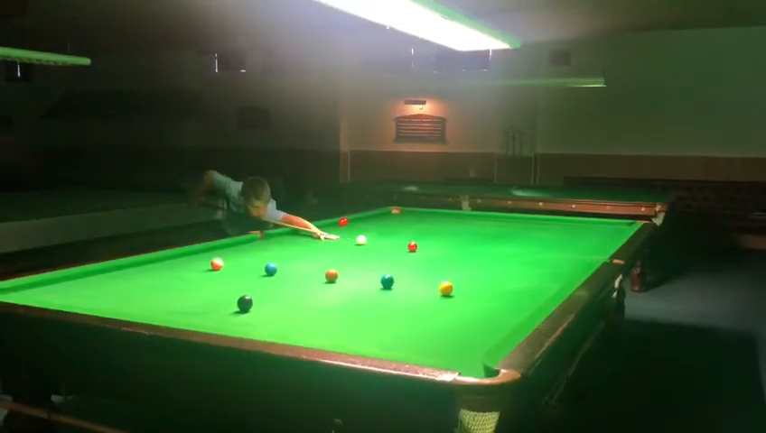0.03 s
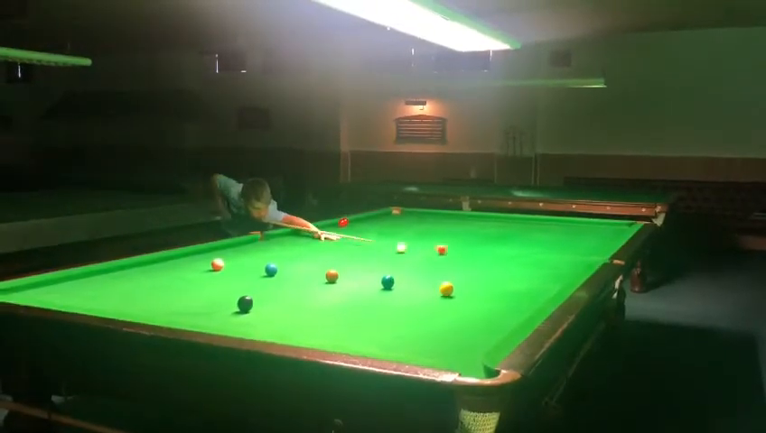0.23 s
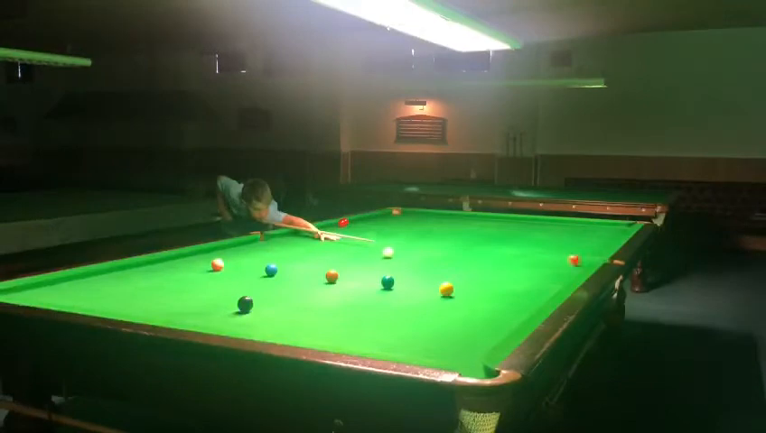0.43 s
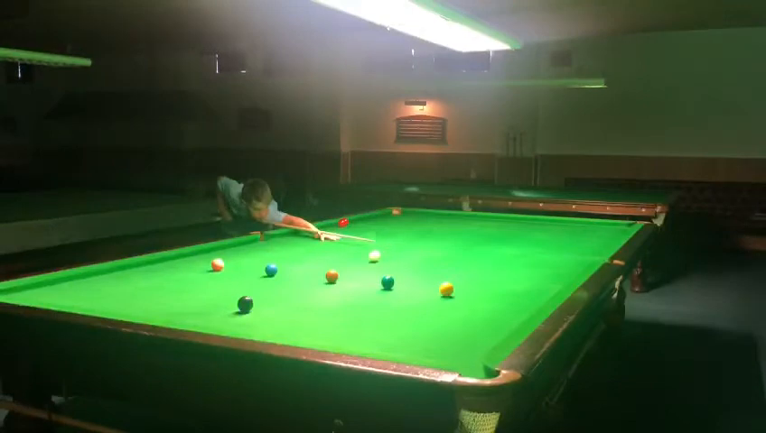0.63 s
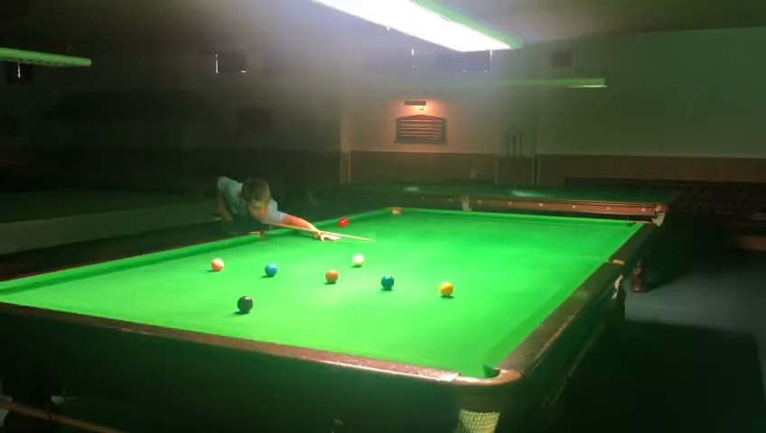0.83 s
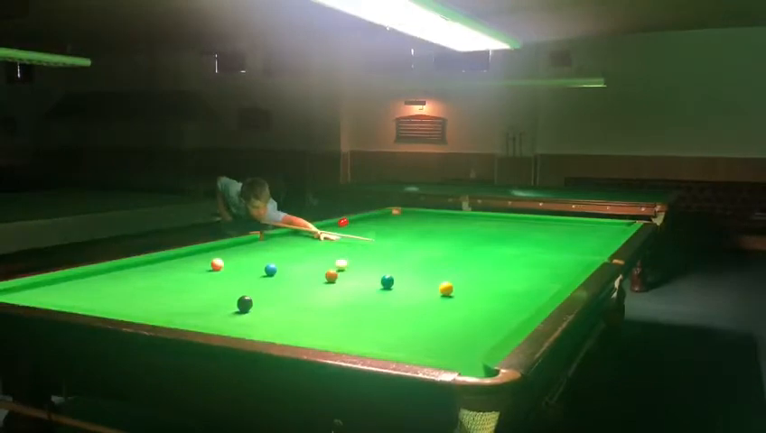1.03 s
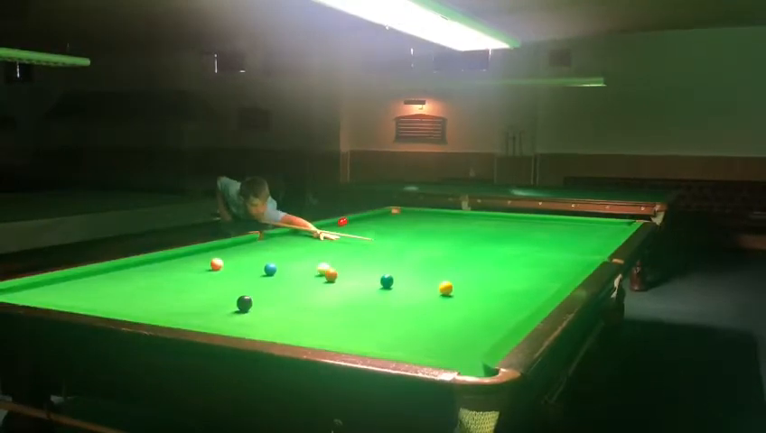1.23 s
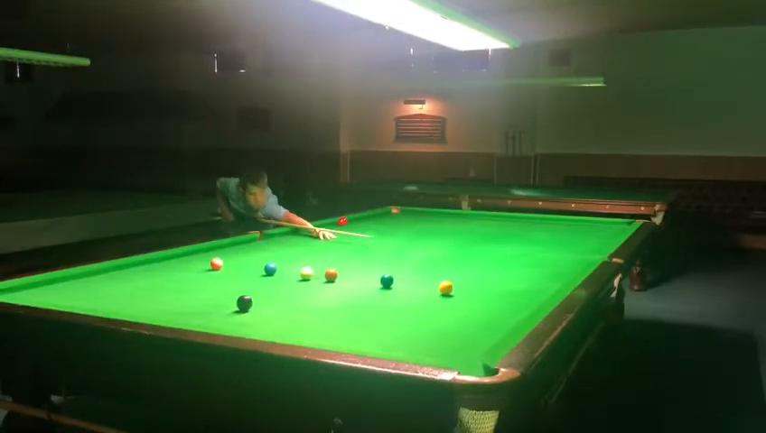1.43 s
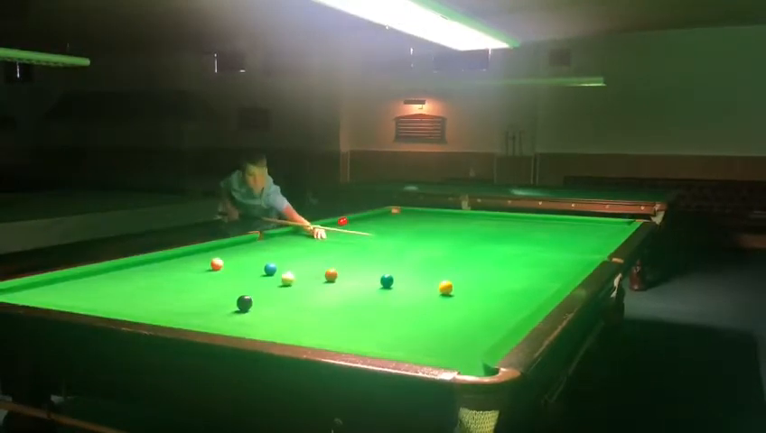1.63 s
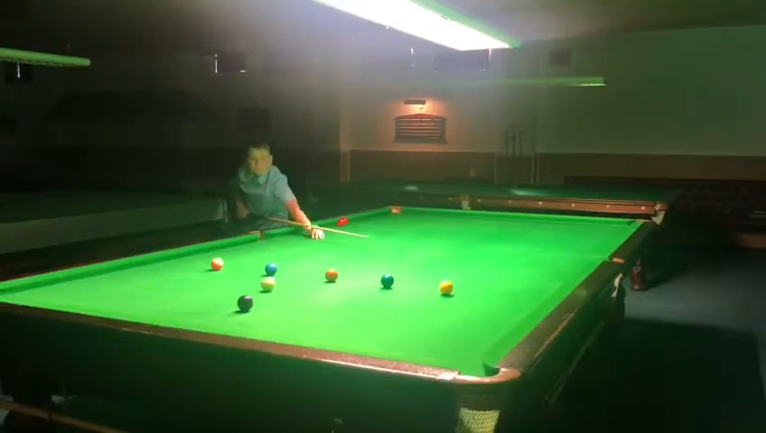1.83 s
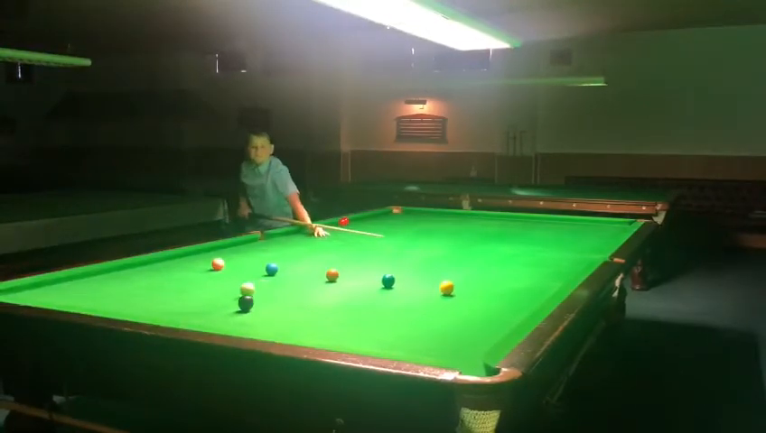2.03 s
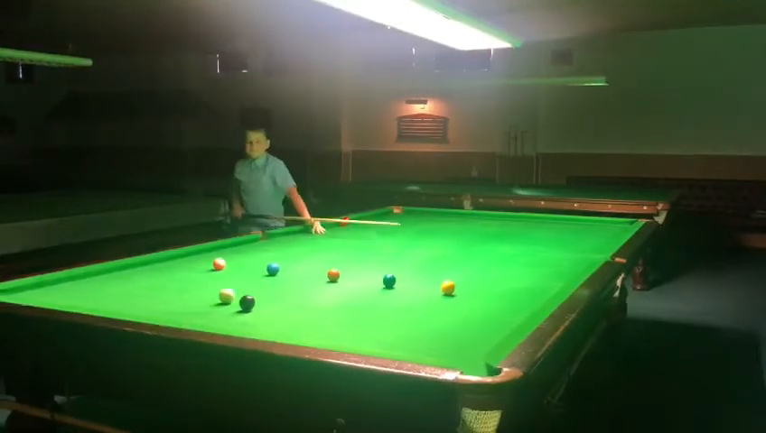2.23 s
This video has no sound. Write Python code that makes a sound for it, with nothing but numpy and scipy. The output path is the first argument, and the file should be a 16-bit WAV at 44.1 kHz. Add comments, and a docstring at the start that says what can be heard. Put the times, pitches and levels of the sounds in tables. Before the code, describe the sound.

Snooker balls collide with a hard click just after a light cue tap. One rumbles softly over the cloth and clatters into a pocket with two smaller clicks. Near the table, only low ventilation hum and faint clothing rustle remain.

```python
"""Snooker balls click in a quiet hall: each hard impact radiates one short pressure pulse.
A cue taps the white, which strikes a red; the red rumbles over the cloth, knocks on the pocket jaws,
clatters down and clicks on a ball below. The wooden shaft and rail ring in their damped modes,
and reflections from the table and walls merge into brief reverberation.
Ventilation hums throughout, the player's clothes rustle, and a faint squeak comes at the end."""
import sys
import numpy as np
from scipy import signal
from scipy.fft import rfft, irfft, next_fast_len
from scipy.io import wavfile
from scipy.ndimage import uniform_filter1d, map_coordinates

SR = 44100
rng = np.random.default_rng(int(sys.argv[2]) if len(sys.argv) > 2 else 0)


def generate_wav(signal):
    """Clip the signal to [-1, 1] and save it as 16-bit WAV at the path in sys.argv[1]."""
    frames = np.transpose(np.atleast_2d(signal))
    scaled = np.clip(frames, -1, 1) * 32767
    pcm = np.round(scaled).astype(np.int16)
    wavfile.write(sys.argv[1], SR, pcm)


N = 105840

# ball on ball: start_s, level_db, dull_db_per_octave, scatter_db, scatter_t60_s, hall_db, walls_db, snap_db
BALL_IMPACTS = [(0.2912, 10, -0.5, 0.5, 0.064, 1, -1, -24), (0.7618, 1, 6.5, 8, 0.067, 5.5, 3, -35),
                (0.8056, -10.5, 9, 6, 0.043, -1.5, -19, -47)]
# spectra of the contact pulse and of its bright snap: frequency_hz, level_db
CLICK_SPECTRUM = [(50, -33), (300, -16.5), (700, -25.5), (1200, -12), (2400, 5.5), (3900, 2.5),
                  (4700, -9.5), (6000, -27.5), (8000, -31.5), (11000, -29.5)]
SNAP_SPECTRUM = [(100, -36.5), (2500, -17.5), (5000, 20), (8000, -2), (9500, 4.5), (11000, 6.5)]
# impacts on the padded jaws and on the hard pocket frame: start_s, level_db, dull_db_per_octave
JAW_IMPACTS = [(.5965, 8, 3), (.6005, 12, 0.5), (.6048, 15.5, 4), (.6205, 9.5, 2)]
FRAME_IMPACTS = [(.6330, 1, -2), (.6375, 1.5, 2), (.6435, 8.5, 5.5), (.6525, 1.5, 3.5), (.659, 0.5, 2)]
# spectra of those impacts and of the cue's tap: frequency_hz, level_db
JAW_SPECTRUM = [(40, -60), (120, -25.5), (200, -5), (300, 2), (480, 2.5), (750, -4), (1200, -1), (2000, -9),
                (2900, -27.5), (3600, -23.5), (5500, -35), (12000, -54)]
FRAME_SPECTRUM = [(40, -32), (120, -19), (260, -6), (700, -4), (1400, 0.5), (2000, -4), (2700, -0.5),
                  (3500, -15.5), (4400, -15.5), (5800, -26.5), (11500, -37)]
CUE_SPECTRUM = [(40, -35.5), (120, -23), (200, -2), (350, -7), (550, -2), (1100, 1.5), (1500, -4.5),
                (2200, -7.5), (4000, -10.5), (6500, -24.5), (8500, -21.5), (12000, -32.5)]
# soft bumps on the pocket lip and net: start_s, level_db, pitch_hz
NET_BUMPS = [(0.58, -29, 200), (.657, -31, 467), (0.679, -33, 284), (.698, -24, 404), (0.726, -23.5, 275)]
# modes of the wooden rail and cue shaft: pitch_hz, level_db, t60_s
RAIL_MODES = [(202.5, -38.5, 0.76), (254, -40.5, 0.45), (292, -33.5, 0.49), (322.4, -54.5, 1),
              (453, -45, 0.27), (480, -27, 0.047), (706.5, -34, 0.29), (742, -39, 0.34),
              (1000, -28.5, 0.082), (1093, -27.5, 0.095)]
SHAFT_MODES = [(207.2, -41.5, 1), (566, -31, 0.055), (750, -36.5, 0.16), (1051.3, -27, 0.1),
               (1298, -40, 0.16), (1832, -33.5, .19), (2096, -29, 0.067), (2330, -29, .06),
               (2780, -40.5, .09), (3470, -29.5, .055)]
# envelopes of the rolling balls and of the player straightening up: time_s, level_db
ROLL_ENVELOPE = [(.22, -75), (.31, -52), (.46, -50), (.56, -49), (.8, -47), (1.1, -68), (1.6, -66),
                 (2.4, -70)]
RUSTLE_ENVELOPE = [(0, -76), (.18, -62), (.5, -74.5), (1.4, -71.5), (1.8, -69), (2.05, -65.5), (2.2, -65),
                   (2.4, -66.5)]
# spectra of rolling, clothes and the hall's air: frequency_hz, level_db
ROLL_SPECTRUM = [(40, -44), (170, -9.5), (205, -3.5), (235, -0.5), (260, 6), (300, -12.5), (500, -22),
                 (1000, -32), (3000, -75.5)]
RUSTLE_SPECTRUM = [(150, -11), (400, -1.5), (1000, -4.5), (1900, -12.5), (2600, -20.5), (5000, -20.5),
                   (11000, -25)]
AIR_SPECTRUM = [(15, -55), (25, -28), (70, -2), (114, -12), (143, -6), (171, -10), (279, -14.5), (317, -18),
                (431, -16), (466, -16.5), (503, -17.5), (633, -23.5), (980, -26.5), (11500, -57),
                (15000, -87.5), (22000, -120)]
# ventilation tones: pitch_hz, level_db, unsteady_fraction
HUM_TONES = [(83.5, -85.5, 1), (141.9, -56, 0.9), (284, -66.5, 0.6), (429.6, -73.5, 0.3)]
# reflections off the table top, rails and lamp, and echoes off the walls: delay_s, gain_db
TABLE_ECHOES = [(.0023, -15), (.0051, -6), (.0085, -13), (0.0117, -12.5), (0.015, -15)]
WALL_ECHOES = [(.043, -11), (.064, -19), (.113, -19.5), (.130, -18), (.173, -23.5)]
# colour of the clicks' reflections and of the reverberation: frequency_hz, gain_db
REFLECTION_SPECTRUM = [(300, 10), (1400, 5.5), (2500, -1), (3500, -3), (4500, -8), (11000, -3)]
HALL_SPECTRUM = [(150, 5), (1000, 3.5), (3300, -2.5), (5000, -6), (8000, -5), (11000, -11)]
# reverberation time of the hall: frequency_hz, t60_s
HALL_DECAY = [(150, .9), (400, 0.76), (1200, 0.5434), (3000, 0.526), (5000, 1), (10000, 0.6)]


def ball_clicks():
    """Elastic impact: hard balls do not ring, but emit a symmetric pulse and a snap; echoes are duller."""
    out = np.zeros(N)
    lead = SR // 100  # room for the pulse's first half
    for start_s, db, dull_db, scatter_db, scatter_t60, hall_db, walls_db, snap_db in BALL_IMPACTS:
        impulse = signal.unit_impulse(2 * lead, lead)
        pulse = amp(db) * filtered(impulse, lambda hz: dulled(CLICK_SPECTRUM, dull_db, hz))
        reflected = filtered(pulse, lambda hz: amp(along(REFLECTION_SPECTRUM, hz)))
        walls = [(delay_s, gain_db + walls_db) for delay_s, gain_db in WALL_ECHOES]
        echoes = propagate(reflected, scatter_db, scatter_t60, hall_db, TABLE_ECHOES, walls, -np.inf)
        add(out, start_s - lead / SR, pulse)
        add(out, start_s - lead / SR, echoes)
        out += impacts([(start_s, snap_db, 0)], SNAP_SPECTRUM,
                       direct_db=-10, scatter_db=-0.5, scatter_t60=0.03, hall_db=-10.5)
    return out


def pocket():
    """Contact stiffness sets brightness: padded jaws knock, the frame clacks, rail and net ring low."""
    jaws = impacts(JAW_IMPACTS, JAW_SPECTRUM, direct_db=-8, scatter_db=-2, scatter_t60=0.024, hall_db=-6.5)
    rail = ringing(RAIL_MODES, start_s=0.603, level_db=2.5, hall_db=-17)
    frame = impacts(FRAME_IMPACTS, FRAME_SPECTRUM,
                    direct_db=-1, scatter_db=3.5, scatter_t60=0.08, hall_db=-1.5)
    bump_t60_s = 0.057
    net = sum(ringing([(hz, 0, bump_t60_s)], start_s, db, hall_db=-17, rise_s=0.0015)
              for start_s, db, hz in NET_BUMPS)
    return jaws + rail + frame + net


def cue(start_s=0.2178, tap_db=6.5):
    """Impulsive excitation: the tip's tap on the white sets the shaft's modes ringing."""
    tap = impacts([(start_s, tap_db, 0)], CUE_SPECTRUM,
                  direct_db=-6.5, scatter_db=5, scatter_t60=0.076, hall_db=2)
    return tap + ringing(SHAFT_MODES, start_s, level_db=-0.5, hall_db=-4.5)


def rolling():
    """Rolling contact: balls on cloth and slate radiate a low band of noise."""
    return envelope(ROLL_ENVELOPE) * noise(ROLL_SPECTRUM)


def squeak(peak_s=2.374, decay_s=0.018, pitch_hz=3600, half_width_hz=190, level_db=-64):
    """Narrow-band noise is heard as a pitch; a Gaussian envelope makes it a brief squeak."""
    band = filtered(rng.standard_normal(N), lambda hz: 1 / (1 + ((hz - pitch_hz) / half_width_hz) ** 2))
    swell = np.exp(-((np.arange(N) / SR - peak_s) / decay_s) ** 2)
    return amp(level_db) * unit(band) * swell


def rustle():
    """Friction: the player's clothes give off soft broadband noise."""
    return envelope(RUSTLE_ENVELOPE) * noise(RUSTLE_SPECTRUM)


def ventilation(air_db=-54.5):
    """Random modulation: hum tones waver in amplitude and phase over steady air noise."""
    t = np.arange(N) / SR
    hum = np.zeros(N)
    for hz, db, unsteady in HUM_TONES:
        phasor = 1 - unsteady + unsteady * (wobble(14) + 1j * wobble(18)) / 2
        tone = np.sqrt(2) * np.cos(2 * np.pi * hz * t + np.angle(phasor))
        hum += amp(db) * unit(np.abs(phasor)) * tone
    return hum + amp(air_db) * noise(AIR_SPECTRUM)


def impacts(rows, spectrum, **path):
    """Superposition: each contact adds one pulse with its reflections."""
    out = np.zeros(N)
    for start_s, db, dull_db in rows:
        add(out, start_s, amp(db) * propagate(contact_pulse(spectrum, dull_db), **path))
    return out


def contact_pulse(spectrum, dull_db):
    """Minimum phase: a causal pulse delivers its energy as early as its spectrum allows."""
    n = np.arange(SR // 10)
    gain = dulled(spectrum, dull_db, np.fft.rfftfreq(len(n), 1 / SR))
    cepstrum = irfft(np.log(gain))
    causal_fold = np.where(n < len(n) / 2, 1 + (n > 0), 0)
    return irfft(np.exp(rfft(cepstrum * causal_fold)))


def dulled(spectrum, dull_db, hz, corner_hz=1300):
    """Spectral tilt: a softer contact loses dull_db per octave above the corner."""
    return amp(along(spectrum, hz) - dull_db * np.log2(np.maximum(hz / corner_hz, 1)))


def ringing(modes, start_s, level_db, hall_db, rise_s=0.00091, bass_cut_hz=150):
    """Free vibration: modes decay exponentially, and a small body radiates no deep bass."""
    t = np.arange(SR) / SR
    vibration = sum(amp(db - 60 * t / t60) * np.sin(2 * np.pi * hz * t) for hz, db, t60 in modes)
    vibration *= 1 - np.exp(-t / rise_s)
    radiated = signal.sosfilt(signal.butter(4, bass_cut_hz, "high", fs=SR, output="sos"), vibration)
    out = np.zeros(N)
    add(out, start_s, amp(level_db) * propagate(radiated, scatter_db=-14, scatter_t60=0.064, hall_db=hall_db))
    return out


def propagate(sound, scatter_db, scatter_t60, hall_db, table=(), walls=(), direct_db=0):
    """Convolution: sound arrives directly, by early reflections and as reverberation."""
    path = amp(hall_db) * hall_tail()
    path[:SR // 4] += amp(scatter_db) * scatter(scatter_t60)
    path[0] += amp(direct_db)
    for delay_s, db in table:
        path[round(delay_s * SR)] += amp(db)
    for delay_s, db in walls:
        path[round(delay_s * SR):][:SR // 4] += amp(db) * scatter(t60=0.017)
    return signal.fftconvolve(sound, path)


def scatter(t60, rise_s=0.001, length_s=0.2):
    """Diffuse reflection: dense early echoes of unit energy and nearly flat spectrum."""
    t = np.arange(SR // 4) / SR
    fade = amp(-60 * t / t60) * (1 - np.exp(-t / rise_s))
    spectrum = rfft(rng.standard_normal(len(t)) * fade)
    colour = np.sqrt(uniform_filter1d(np.abs(spectrum) ** 2, size=100))
    echoes = irfft(spectrum / colour, len(t)) * (t < length_s)
    return echoes / np.linalg.norm(echoes)


def hall_tail(build_s=0.025):
    """Reverberation: a diffuse field builds up, then each band decays at its own rate."""
    hz, t, bands = signal.stft(rng.standard_normal(SR), SR, nperseg=256)
    t60 = along(HALL_DECAY, hz)[:, None]
    equal_energy = np.sqrt(2 * np.log(1000) / (t60 * SR))
    gain = amp(along(HALL_SPECTRUM, hz)[:, None] - 60 * t / t60) * equal_energy
    tail = signal.istft(bands * gain, SR, nperseg=256)[1][:SR]
    return tail * (1 - np.exp(-np.arange(SR) / SR / build_s))


def amp(db):
    """Decibels to gain."""
    return 10 ** (np.asarray(db) / 20)


def unit(x):
    """Normalisation to rms 1."""
    return x / np.sqrt(np.mean(x ** 2) + 1e-20)


def along(points, hz):
    """Interpolation on a logarithmic frequency axis."""
    knots_hz, values = np.transpose(points)
    return np.interp(np.log(hz + 1), np.log(knots_hz + 1), values)


def envelope(points):
    """Gain per sample, interpolated in decibels."""
    return amp(np.interp(np.arange(N) / SR, *np.transpose(points)))


def wobble(knots_per_s):
    """A smooth curve through random knots."""
    return map_coordinates(rng.standard_normal(256), [np.arange(N) * knots_per_s / SR], mode="wrap")


def filtered(x, response):
    """Linear filtering: the spectrum is multiplied by a frequency response."""
    size = next_fast_len(len(x) + SR // 4)
    return irfft(rfft(x, size) * response(np.fft.rfftfreq(size, 1 / SR)), size)[:len(x)]


def noise(spectrum):
    """Coloured noise of rms 1."""
    return unit(filtered(rng.standard_normal(N), lambda hz: amp(along(spectrum, hz))))


def add(track, start_s, sound):
    """Mix a sound into the track at start_s."""
    start = max(round(start_s * SR), 0)
    track[start:start + len(sound)] += sound[:N - start]


def scene():
    """Superposition: the pressures of all sources sum in one channel."""
    return (cue() + ball_clicks() + pocket() + rolling() + ventilation() + rustle() + squeak())[None]


def record(dry, cutoff_hz=11700):
    """Band limiting: a steep low-pass removes the highest treble."""
    return np.array([filtered(x, lambda hz: 1 / np.sqrt(1 + (hz / cutoff_hz) ** 140)) for x in dry])


dry = scene()
out = record(dry)
generate_wav(out)
```